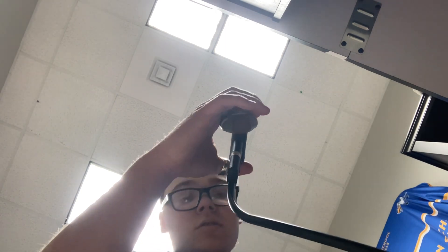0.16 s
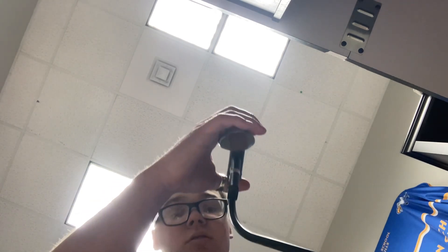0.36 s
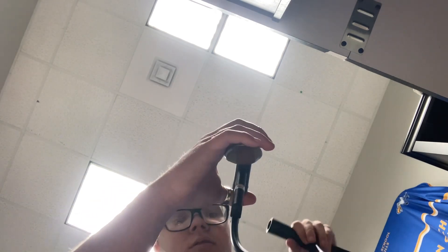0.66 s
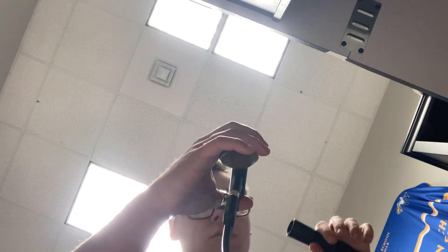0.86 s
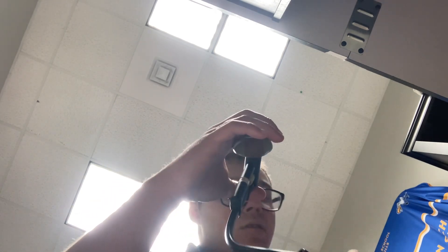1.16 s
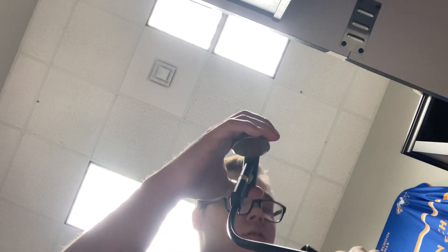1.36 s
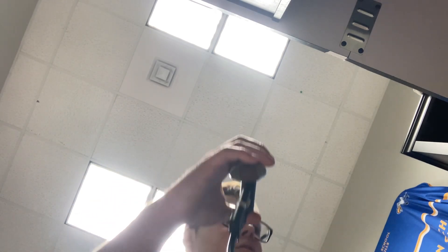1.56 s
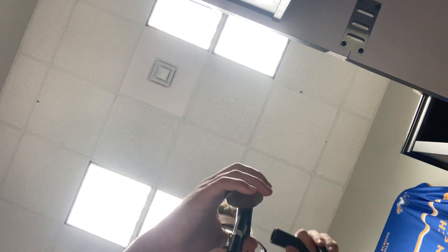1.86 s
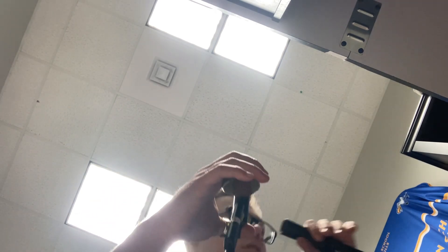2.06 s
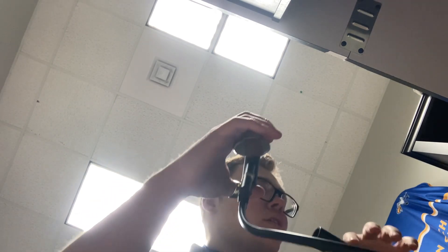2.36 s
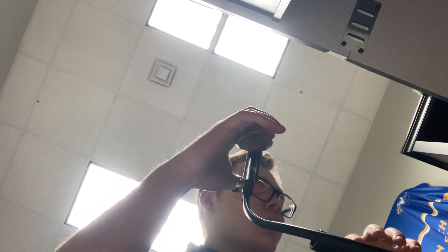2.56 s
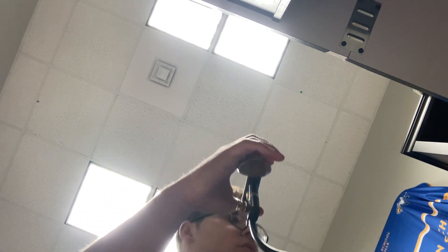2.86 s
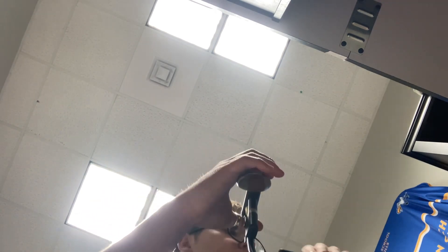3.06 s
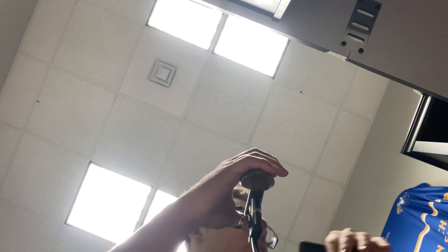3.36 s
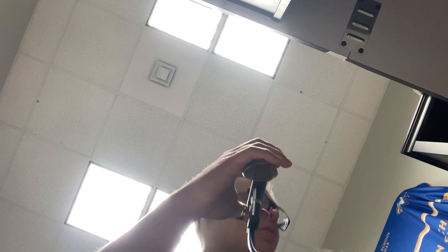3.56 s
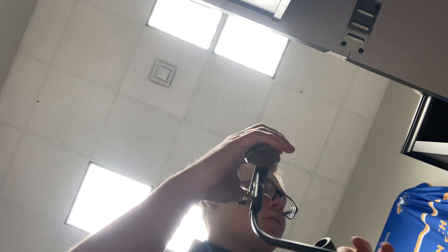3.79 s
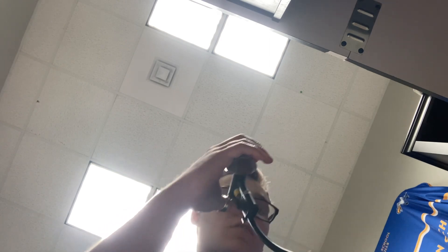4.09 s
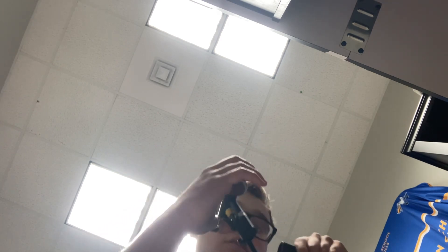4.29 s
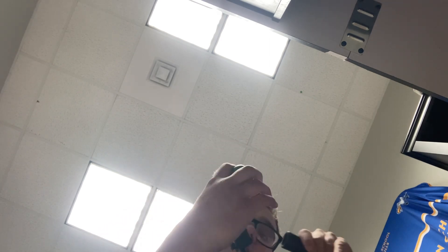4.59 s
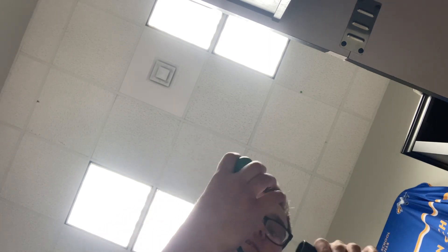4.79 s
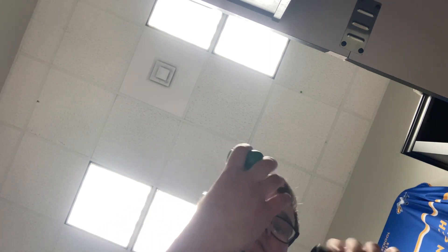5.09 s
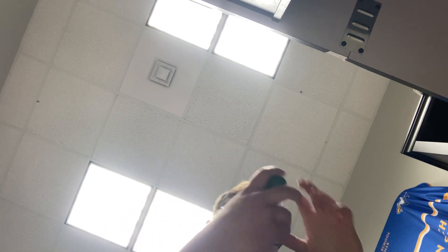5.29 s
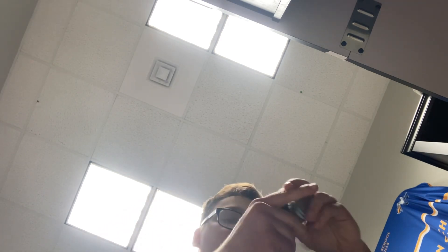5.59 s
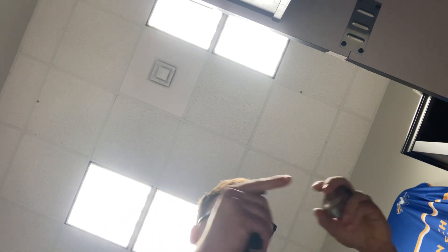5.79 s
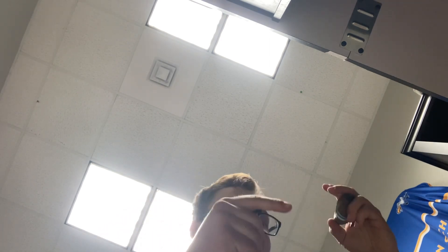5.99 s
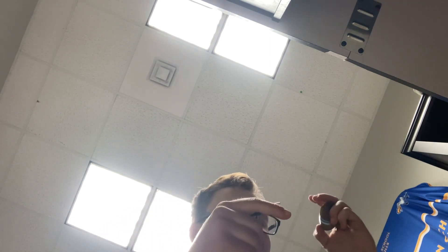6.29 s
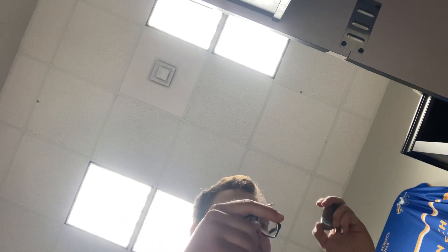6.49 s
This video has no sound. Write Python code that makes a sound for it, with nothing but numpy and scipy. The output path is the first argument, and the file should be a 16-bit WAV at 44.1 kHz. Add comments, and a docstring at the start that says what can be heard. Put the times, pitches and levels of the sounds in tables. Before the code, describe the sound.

Close stereo sound of a plastic hand pump indoors: the tail of one push, then four more whistling, rasping jets of air, each shut off by a dull hollow barrel knock. Thin intake hiss, shaft ticks and slight hand brushing fill the gaps. A sharp coupling click follows the third push. Pumping ends with a dense clatter and soft rubbing, while the fan drone and duct rumble continue.

```python
"""A hand bicycle pump is worked five times close to the microphone, in a room with humming ventilation.
Each push is a turbulent jet that rings valve, nozzle and hose, and ends in a hollow knock of barrel modes.
Each pull is a thin hiss of air sucked past the seal; hands brush the barrel as shaped noise.
Shaft and hose rattle in bursts of micro-impacts, most densely when the pump is put aside; a coupling snaps.
The ventilation is resonant and coloured noise whose rumble turns from centred to wide."""
import sys
import numpy as np
from scipy import signal
from scipy.fft import rfft, irfft
from scipy.io import wavfile
from scipy.ndimage import map_coordinates

SR = 44100
rng = np.random.default_rng(int(sys.argv[2]) if len(sys.argv) > 2 else 0)


def bounce(signal):
    """Save signal as a 16-bit WAV file at the path given by the first command-line argument."""
    frames = np.transpose(np.atleast_2d(signal))
    limited = np.clip(frames, -1, 1)
    pcm = np.round(limited * 32767).astype(np.int16)
    wavfile.write(sys.argv[1], SR, pcm)


N = 293220
T = np.arange(N) / SR  # seconds
HZ = np.maximum(np.arange(N // 2 + 1) * SR / N, 1)  # frequency of each Fourier bin


def undb(db):
    """Level law: decibels to amplitude gain."""
    return 10 ** (np.asarray(db) / 20)


def unit(x):
    """Power normalization: scale to rms 1."""
    return x / np.sqrt(np.mean(x ** 2))


def noise():
    """White noise: equal power at all frequencies."""
    return rng.standard_normal(N)


def over_hz(points, hz):
    """Logarithmic frequency scale: interpolate (Hz, value) points along it."""
    f, value = np.transpose(points)
    return np.interp(np.log(hz), np.log(f), value)


def colour(x, points):
    """Minimum-phase filtering: a causal response with the given (Hz, dB) magnitude."""
    cepstrum = irfft(np.log(undb(over_hz(points, HZ))), N)
    # folding the cepstrum onto positive time makes the filter causal
    cepstrum[1:N // 2] *= 2
    cepstrum[N // 2:] = 0
    impulse_response = irfft(np.exp(rfft(cepstrum)), N)[:SR // 4]
    return signal.fftconvolve(x, impulse_response)[:N]


def resonate(x, modes, order=1):
    """Resonance: parallel (Hz, width in Hz, dB) modes; order 2 has steeper skirts."""
    response = 0
    for f, width, db in modes:
        detuning = (HZ / f - f / HZ) * f / width
        response = response + undb(db) / (1 + 1j * detuning) ** order
    return irfft(rfft(x) * response, N)


def flutter(rate, depth_db):
    """Random amplitude modulation: a gain wavering between random levels, `rate` per second."""
    knots = rng.standard_normal(4000)
    return undb(depth_db * np.interp(T * rate, np.arange(len(knots)), knots))


def drift(x, rate, depth):
    """Random frequency modulation: uneven reading speed lets the pitch wander by a small share."""
    knots = rng.standard_normal(200)
    detune = depth * np.interp(T * rate, np.arange(len(knots)), knots)
    return map_coordinates(x, [np.arange(N) + np.cumsum(detune)], order=3, mode="mirror")


def turn(x, radians):
    """Constant phase shift: every frequency is turned by the same angle."""
    return irfft(rfft(x) * np.exp(1j * radians), N)


def add(track, s, sound):
    """Superposition: mix a sound in at a time in seconds."""
    i = max(int(s * SR), 0)
    track[..., i:i + sound.shape[-1]] += sound[..., :N - i]


# Decay of a small, dry room. Each row: frequency in Hz, t60 in seconds.
ROOM_DECAY = [(250, 0.34), (600, 0.35), (1500, 0.22), (4000, 0.24), (9000, 0.15), (16000, 0.073)]


def tail(onset_s, bounce_db):
    """Reverberant decay, energy 1: strong early sound off the desk, then a wash with the top dying first."""
    f, t, z = signal.stft(rng.standard_normal(SR * 3 // 5), SR, nperseg=256)
    decay = np.exp(-np.log(1000) * t / over_hz(ROOM_DECAY, f + 1)[:, None])
    h = signal.istft(z * decay, SR, nperseg=256)[1]
    t = T[:len(h)]
    onset = 1 - np.exp(-(t / onset_s) ** 2)
    early = 1 + undb(bounce_db) * np.exp(-t / 0.011)
    h = h * onset * early
    return h / np.sqrt(np.sum(h ** 2))


def room(x, wet_db):
    """Reverberation: convolution of a sound with the decay of the room."""
    return undb(wet_db) * signal.fftconvolve(x, tail(onset_s=0.002, bounce_db=2))[:N]


# Stereo width near the microphone. Each row: frequency in Hz, side over mid in dB.
NEAR_WIDTH = [(200, -11), (600, 1.5), (1000, -3), (2400, 2), (3500, -1.5), (5700, -2), (6800, -36),
              (16000, -76)]


def place(x, wet_db):
    """Mid-side stereo: the side of a near sound leads by a quarter cycle; the two reverberate separately."""
    side_source = x + room(x, wet_db)
    side = irfft(1j * undb(over_hz(NEAR_WIDTH, HZ)) * rfft(side_source), N)
    return np.array([x + room(x, wet_db), side])


def contacts(times, levels_db, spectrum, decay_s, rise_s):
    """Impact noise: brief bursts of micro-impacts that build up and die away exponentially."""
    out, t = np.zeros(N), T[:SR // 8]
    envelope = np.exp(-t / decay_s) * (1 - np.exp(-t / rise_s))
    for s, db in zip(times, levels_db):
        add(out, s, undb(db) * rng.standard_normal(len(t)) * envelope)
    spectrum_rms = np.sqrt(np.mean(undb(over_hz(spectrum, HZ)) ** 2))
    return colour(out, spectrum) / spectrum_rms


def stroke(start, peak, end, open_s, swell_db_per_s, sag_db_per_s, shut_s):
    """Flow envelope, fastest at its peak: it opens up to its start, swells, sags, and shuts just after its end."""
    edges = np.clip(1 + np.minimum((T - start) / open_s, (end - T) / shut_s - 1 + 1), 0, 1) ** 2
    swell_db = -swell_db_per_s * np.maximum(peak - T, 0)
    sag_db = -sag_db_per_s * np.maximum(T - peak, 0)
    return edges * undb(swell_db + sag_db)


def swells(rows):
    """Gaussian envelopes: short bell-shaped swells from (middle s, half length s, dB) rows."""
    bells = 0
    for s, half_s, db in rows:
        bells = bells + undb(db) * np.exp(-np.minimum(((T - s) / half_s) ** 2, 20))
    return bells


# Resonances of the fan's drone. Each row: frequency in Hz, width in Hz, relative level in dB.
FAN_MODES = [(80.93, 15.2, -12), (120.3, 7.5, -16.5)]
# Slow swell of the drone. Each row: time in seconds, level in dB.
FAN_SWELL = [(0, -43), (1.3, -38), (2.3, -40.5), (5.2, -39), (5.8, -35), (6.65, -43)]
# Resonances of the duct rumble. Each row: frequency in Hz, width in Hz, relative level in dB.
RUMBLE_MODES = [(113.6, 13, -5.5), (157.4, 32, 4.5), (223, 31.7, -3.5), (286.8, 17.7, -5.5)]
# Spectrum of the broad air noise in the ducts. Each row: frequency in Hz, relative level in dB.
DUCT_SPECTRUM = [(20, -56.5), (35, -12), (58, 2), (80, -7), (102, -19.5), (165, -17.5), (220, -31.5),
                 (300, -20), (440, -24), (640, -40), (900, -42.5), (2300, -58), (3000, -65), (16000, -67)]
# Stereo width of that air noise. Each row: frequency in Hz, side over mid in dB.
DUCT_WIDTH = [(25, -12), (60, -9.5), (100, -1), (170, 6), (260, 6.5), (450, -10), (700, 2), (1500, 7),
              (3000, 4), (6000, -3), (9000, -39)]
RUMBLE_DB, DUCT_DB = -42.5, -42
# the rumble turns from centred to wide about this time, over this long
WIDENS_S, WIDENING_S = 2.23, 0.24
CENTRED_SIDE_DB, WIDE_MID_DB, WIDE_SIDE_DB = -9, -8.5, 2.5
ALIKE_BELOW_HZ = 460  # well above this, mid and side hear unrelated air


def ventilation():
    """Resonance and coherence: a fan drones over duct rumble; bass is shared, shifted in phase."""
    wide = np.clip((T - WIDENS_S) / WIDENING_S + .5, 0, 1)
    fan_gain = undb(np.interp(T, *np.transpose(FAN_SWELL)))
    fan = fan_gain * unit(resonate(noise(), FAN_MODES, order=2))
    rumble = undb(RUMBLE_DB) * unit(resonate(noise(), RUMBLE_MODES, order=2))

    duct = unit(colour(noise(), DUCT_SPECTRUM))
    other_air = unit(colour(noise(), DUCT_SPECTRUM))
    alike = 1 / np.hypot(1, (HZ / ALIKE_BELOW_HZ) ** 2)
    side_bins = alike * rfft(duct) + np.sqrt(1 - alike ** 2) * rfft(other_air)
    duct_side = undb(DUCT_DB) * irfft(side_bins * undb(over_hz(DUCT_WIDTH, HZ)), N)

    centred_side = turn(undb(CENTRED_SIDE_DB) * (fan + rumble) + undb(0.5) * duct_side, radians=-2.57)
    wide_side = turn(undb(-4.5) * fan + undb(WIDE_SIDE_DB) * rumble + duct_side, radians=-1.69)
    mid = fan + undb(WIDE_MID_DB * wide) * rumble + undb(DUCT_DB) * duct
    return np.array([mid, (1 - wide) * centred_side + wide * wide_side])


# Pushes of the pump. Each row: start in seconds, fastest flow in seconds, end in seconds, level in dB,
# hiss over that in dB, whistle over that in dB, lowest resonance of the nozzle in Hz.
PUSH_STROKES = [(-.45, 0.003, 0.028, -43.5, -2.5, -0.5, 4860), (0.845, 1.166, 1.253, -41.5, -2, -2, 4720),
                (2.137, 2.38, 2.501, -42.5, -4, -2.5, 4700), (3.384, 3.544, 3.725, -47.5, -4, -2.5, 4810),
                (4.683, 4.973, 5.01, -53, 0.5, 0, 5140)]
# Spectrum of the turbulent jet. Each row: frequency in Hz, relative level in dB.
JET_SPECTRUM = [(900, -17), (2600, -13), (3300, -12), (4200, -29), (5400, -6), (7200, -0.5), (10500, 0),
                (12000, -5), (14500, -1.5), (16000, -2)]
# Resonances of the valve. Each row: frequency in Hz, width in Hz, relative level in dB.
VALVE_MODES = [(4050, 240, -2), (6430, 160, 1.5), (8580, 34, 3), (10400, 190, -7.5), (10530, 170, 0)]
# Resonances of the nozzle. Each row: ratio to the lowest, width in Hz, relative level in dB.
NOZZLE_MODES = [(1.001, 260, 7.5), (1.056, 130, 14.5), (1.17, 220, 9), (1.32, 140, 0)]
# Resonances of the hose. Each row: frequency in Hz, width in Hz, relative level in dB.
HOSE_MODES = [(1011, 380, 8), (1630, 165, 4.5), (1817, 150, 2.5), (2740, 290, -30)]
# A bright spurt of air in the fourth push. Each row: middle in seconds, half length in seconds, level in dB.
AIR_SPURTS = [(3.5, 0.03, -42.5)]
# the flow opens, swells with the pressure, sags as the arm slows and shuts off
OPEN_S, SWELL_DB_PER_S, SAG_DB_PER_S, SHUT_S = 0.15, 25.5, 32.5, 0.039
HOSE_DB = -1  # against the level of the push
WHISTLE_POWER = 1.31  # the nozzle's whistle grows faster than the flow


def push():
    """Jet noise and resonance: a turbulent jet rings valve, nozzle and hose, all driven by one flow."""
    jet = unit(colour(noise(), JET_SPECTRUM)) + undb(-7.0) * unit(resonate(noise(), VALVE_MODES))
    # the hose flexes in the hand, so its resonances wander
    hose = unit(drift(resonate(noise(), HOSE_MODES), rate=9, depth=.06))
    air, flows = 0, 0
    for start, peak, end, level_db, hiss_db, whistle_db, lowest_hz in PUSH_STROKES:
        flow = stroke(start, peak, end, OPEN_S, SWELL_DB_PER_S, SAG_DB_PER_S, SHUT_S)
        modes = [(lowest_hz * ratio, width, db) for ratio, width, db in NOZZLE_MODES]
        whistle = unit(drift(resonate(noise(), modes), rate=8, depth=.01)) * flow ** WHISTLE_POWER
        air = air + undb(level_db + hiss_db) * jet * flow
        air = air + undb(level_db + whistle_db) * whistle
        flows = flows + undb(level_db) * flow
    rasp = flutter(rate=140, depth_db=0.7)
    near_air = place(air * rasp, wet_db=-2)
    near_hose = place(undb(HOSE_DB) * hose * flows * rasp, wet_db=-5.0)
    return near_air + near_hose + place(jet * swells(AIR_SPURTS), wet_db=-5)


# Spectrum of the hollow body's thud. Each row: frequency in Hz, relative level in dB.
THUD_SPECTRUM = [(150, -39.5), (290, 5.5), (450, -3), (600, -7), (880, -2.5), (1200, -16), (2000, -15),
                 (5000, -60.5)]
# Spectrum of the clack. Each row: frequency in Hz, relative level in dB.
CLACK_SPECTRUM = [(500, -11.5), (1000, -6), (1500, 5.5), (2100, 3), (3200, -20.5), (4300, -7.5),
                  (5500, -18), (12000, -35)]
# Spectrum of the sharp tick. Each row: frequency in Hz, relative level in dB.
TICK_SPECTRUM = [(2500, -13), (5200, -19.5), (6300, -5.5), (7300, -10), (8500, -3), (10500, -12),
                 (12000, -21), (16000, -24)]
CLACK_DB, CLACK_FOLLOWS = -1.5, 0.25  # the clack takes this share of the brightness


def touches(s, level_db, bright_db):
    """Impact excitation: touching plastic gives a sharp tick, a clack and a slower thud of the hollow body."""
    clack_db = level_db + CLACK_DB + CLACK_FOLLOWS * bright_db
    thud = contacts(s, level_db + 8, THUD_SPECTRUM, decay_s=0.0044, rise_s=0.0018)
    clack = contacts(s, clack_db, CLACK_SPECTRUM, decay_s=0.0041, rise_s=0.003)
    tick = contacts(s, level_db + bright_db + 11.5, TICK_SPECTRUM, decay_s=0.00076, rise_s=.0001)
    return place(thud + clack + tick, wet_db=-3.5)


# The piston meets its stop. Each row: time in seconds, relative click level in dB,
# then the relative strength of each of the four barrel modes in dB.
PISTON_KNOCKS = [(0.0182, -42, -27, -33.5, -27, -42), (1.2404, -42, -30, -27, -23.5, -38.5),
                 (2.4718, -35.5, -23, -36, -30.5, -51), (3.711, -38.5, -50, -19.5, -26, -43.5),
                 (4.988, -45.5, -17, -28, -31, -45.5)]
# Modes of the barrel. Each row: frequency in Hz, swell time constant in seconds, relative level in dB,
# side over mid in dB.
BARREL_MODES = [(314.4, 0.0027, -6, 0), (549.6, 0.0024, 5.5, 3), (791, 0.0035, -3.5, 6),
                (1947, 0.0027, 5.5, 4)]
# Spectrum of the shuddering pump. Each row: frequency in Hz, relative level in dB.
SHUDDER_SPECTRUM = [(180, -30), (300, -5), (420, -1.5), (570, 4), (800, 1), (1000, -21.5), (1400, -19),
                    (2000, -31), (3000, -38)]


def knocks():
    """Modal excitation: the air-cushioned piston clicks home; barrel modes swell and soon die."""
    out, t = np.zeros((2, N)), T[:SR // 8]
    for s, _, *strengths in PISTON_KNOCKS:
        for (hz, swell_s, db, side_db), strength_db in zip(BARREL_MODES, strengths):
            shape = (t / swell_s / 2) ** 2 * np.exp(2 - t / swell_s)  # peaks at twice swell_s
            phase = 2 * np.pi * hz * (1 + 0.013 * rng.standard_normal()) * t
            mode = np.array([np.sin(phase), undb(side_db) * np.cos(phase)])
            add(out, s, undb(db + strength_db) * shape * mode)
    echo = np.array([room(out[0], wet_db=-7.5), room(out[0], wet_db=-7)])
    # the whole pump shudders on, following the stronger of its two middle modes
    rows = np.array(PISTON_KNOCKS)
    times, click_db = rows[:, 0], rows[:, 1]
    shudder_db = np.max(rows[:, 3:5], axis=1) - 12.5
    shudder = contacts(times, shudder_db, SHUDDER_SPECTRUM, decay_s=0.041, rise_s=0.0039)
    return out + echo + place(shudder, wet_db=-12.5) + touches(times, click_db + 8, bright_db=-12)


# Sharp snaps of the hose coupling. Each row: time in seconds, relative click level in dB,
# relative ring of its shell in dB.
COUPLING_SNAPS = [(0.1738, -53, -75), (0.188, -48, -79), (2.6788, -35.5, -55), (5.7172, -43.5, -43)]
# Spectrum of the click. Each row: frequency in Hz, relative level in dB.
SNAP_SPECTRUM = [(200, -1), (450, 4), (1100, 10), (1800, -1), (2800, 3.5), (4500, -9.5), (6500, -1.5),
                 (8500, 0.5), (10000, 5), (14000, -0.5), (16000, 7)]
# Spectrum of the ringing shell. Each row: frequency in Hz, relative level in dB.
SHELL_SPECTRUM = [(1700, -37), (2600, 0), (3300, -5.5), (4200, -2), (5400, -10), (7500, -1.5), (10000, -26),
                  (12000, -20), (13500, -6), (16000, -26)]


def snaps():
    """Impulsive excitation: the hose coupling snaps with a hard, broad click and a brief ring of its shell."""
    s, click_db, ring_db = np.transpose(COUPLING_SNAPS)
    click = contacts(s, click_db + 9.0, SNAP_SPECTRUM, decay_s=0.00092, rise_s=0.00009)
    ring = contacts(s, ring_db + 11, SHELL_SPECTRUM, decay_s=0.0011, rise_s=0.00013)
    return place(click + ring, wet_db=-4.0)


# Pulls of the pump. Each row: start in seconds, fastest flow in seconds, end in seconds, relative level in dB.
PULL_STROKES = [(0.385, 0.56, 0.62, -56), (1.679, 1.717, 1.85, -54.5), (2.959, 3.03, 3.106, -57.5),
                (4.175, 4.207, 4.325, -58)]
# Spectrum of the sucked air. Each row: frequency in Hz, relative level in dB.
SUCK_SPECTRUM = [(590, -38.5), (1000, -10), (1500, -28), (1730, -2.5), (2100, -7.5), (2810, -6),
                 (2940, -14.5), (4120, -11), (4790, -16), (5760, -14.5), (6550, -5), (8550, -0.5),
                 (10400, -5.5), (13400, -21), (16000, -13)]
# Hands sliding along the barrel. Each row: middle in seconds, half length in seconds, relative level in dB.
HAND_SLIDES = [(.19, 0.018, -59), (1.59, 0.018, -66), (2.84, 0.037, -71.5), (4.07, 0.042, -65.5),
               (5.145, 0.073, -64.5), (5.45, 0.056, -65.5), (5.59, 0.048, -67.5), (5.725, 0.048, -68)]
# Spectrum of the sliding skin. Each row: frequency in Hz, relative level in dB.
SLIDE_SPECTRUM = [(1500, -1), (3000, 1.5), (5000, 2.5), (8000, 9), (12000, 8), (16000, -2)]
PULL_OPEN_S, PULL_SHUT_S, PULL_ARCH_DB_PER_S = 0.13, .11, 34.5


def pull():
    """Flow and friction noise: a thin intake hiss past the seal, and skin brushing the barrel."""
    flow = 0
    for start, peak, end, db in PULL_STROKES:
        arch = stroke(start, peak, end, PULL_OPEN_S, PULL_ARCH_DB_PER_S, PULL_ARCH_DB_PER_S, PULL_SHUT_S)
        flow = flow + undb(db) * arch
    intake = undb(0.26) * unit(colour(noise(), SUCK_SPECTRUM)) * flow
    brush = undb(0.5) * unit(colour(noise(), SLIDE_SPECTRUM)) * swells(HAND_SLIDES)
    return place((intake + brush) * flutter(rate=210, depth_db=1.04), wet_db=-4.5)


# The louder rattles of shaft and hose. Each row: time in seconds, relative level in dB, brightness in dB.
LOUD_RATTLES = [(0.274, -40.5, -24), (.298, -42.5, -9), (.349, -46, -4.5), (.393, -43, -11.5),
                (0.722, -45, -20), (1.604, -49.5, -34), (1.644, -47, -12), (1.685, -40.5, -8.5),
                (1.7, -40.5, -7), (1.907, -45.5, -22), (2.036, -49, -16), (2.892, -48, -24),
                (2.914, -49.5, -2), (2.958, -41.5, -9.5), (3.19, -51.5, -32), (3.517, -28, -9.5),
                (3.604, -48, -20), (3.682, -28.5, -7), (4.065, -45, -43), (4.091, -50, -37),
                (4.175, -43, -8), (5.173, -38, -14), (5.184, -43, -5.5), (5.225, -47, -16),
                (5.262, -33, -8), (5.269, -37, -5), (5.308, -36, -8), (5.367, -35.5, -9.5),
                (5.375, -45, -11), (5.405, -50, -3), (5.719, -47, -39)]
# faint random rattles around each pull
PLAY_PER_S, PLAY_MARGIN_S = 12, .05
PLAY_DB, PLAY_SPREAD_DB, PLAY_BRIGHT_DB = -56, 1.5, -10


def ticks():
    """Random impacts: loud rattles at set times, and the faint play of the shaft as it is drawn out."""
    grids = [np.arange(start - PLAY_MARGIN_S, end + PLAY_MARGIN_S, 1 / PLAY_PER_S)
             for start, _, end, _ in PULL_STROKES]
    s = np.concatenate(grids)
    late, size = rng.standard_normal((200, 2))[:len(s)].T
    play_s = s + late / PLAY_PER_S / 2
    play = touches(play_s, PLAY_DB + PLAY_SPREAD_DB * size, PLAY_BRIGHT_DB)
    return touches(*np.transpose(LOUD_RATTLES)) + play


def scene():
    """Superposition: all sources summed as mid and side, then turned into left and right."""
    mid, side = ventilation() + push() + knocks() + snaps() + pull() + ticks()
    return np.array([mid + side, mid - side])


TOP_HZ = 15850


def record(dry):
    """Band limiting: a steep elliptic low-pass cuts the top."""
    low_pass = signal.ellip(10, .2, 80, TOP_HZ, fs=SR, output="sos")
    return signal.sosfilt(low_pass, dry)


dry = scene()
out = record(dry)
bounce(out)
```